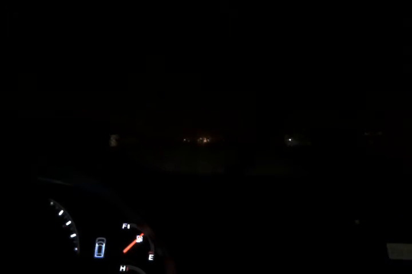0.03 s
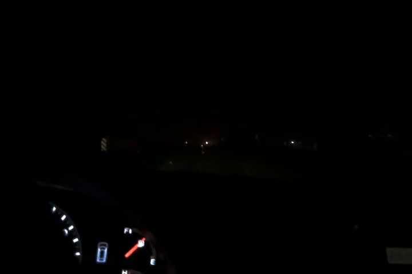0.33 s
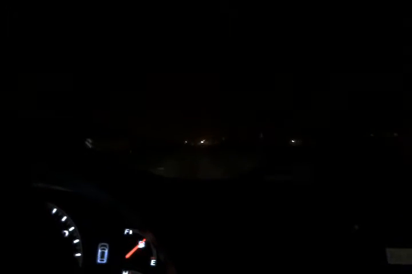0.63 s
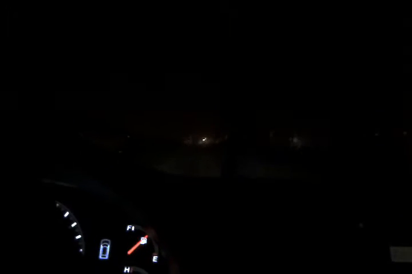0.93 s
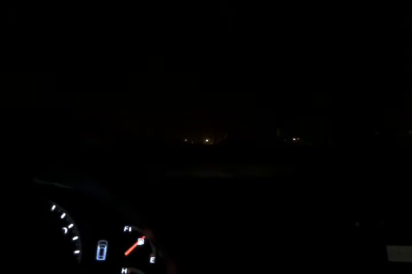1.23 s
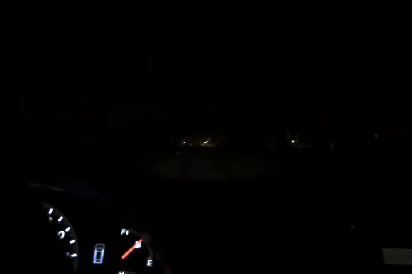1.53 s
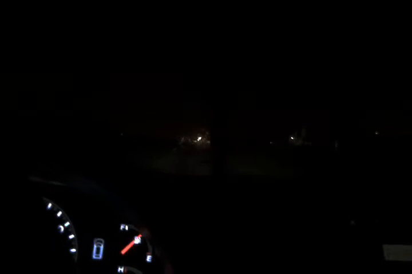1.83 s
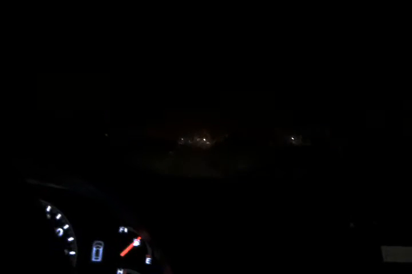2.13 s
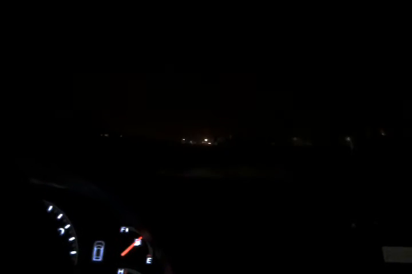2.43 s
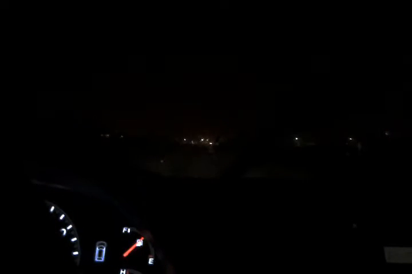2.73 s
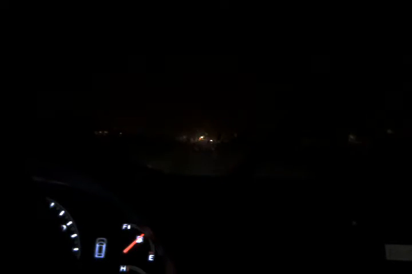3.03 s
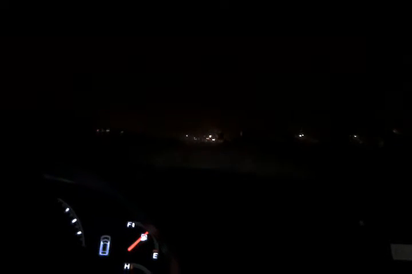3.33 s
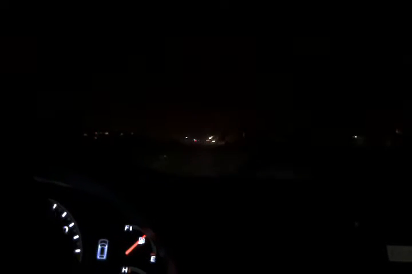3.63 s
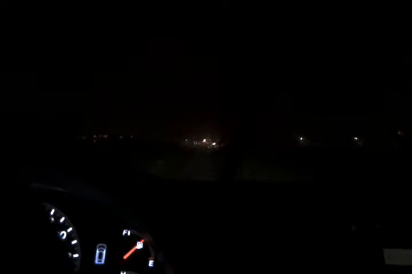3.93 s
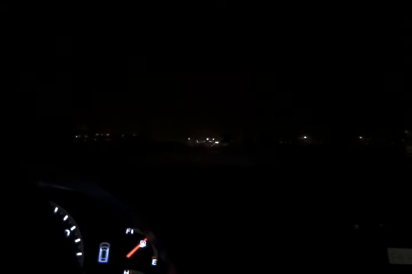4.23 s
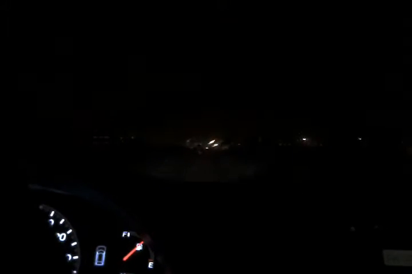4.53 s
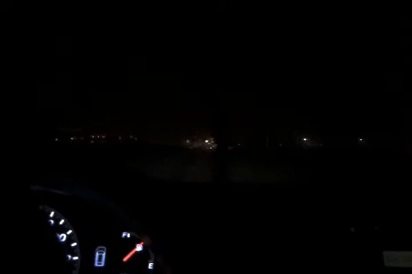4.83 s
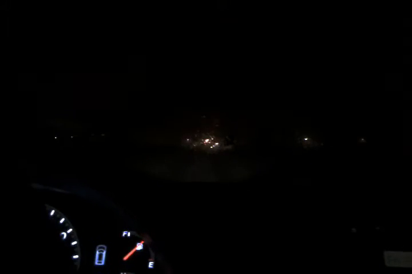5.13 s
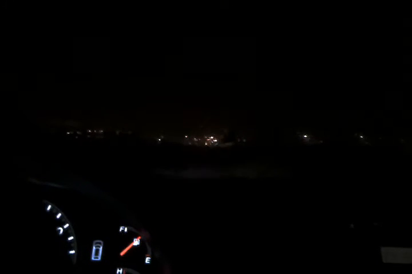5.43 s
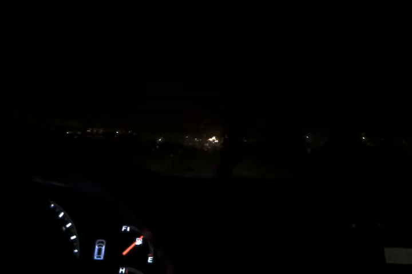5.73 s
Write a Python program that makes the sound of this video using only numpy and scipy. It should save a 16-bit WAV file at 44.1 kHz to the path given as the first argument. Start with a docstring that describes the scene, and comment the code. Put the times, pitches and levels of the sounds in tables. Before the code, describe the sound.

Heavy rain and small hail tick sharply on a car's windshield and drum on the roof, heard inside over faint road rumble.

```python
"""Inside a car driving slowly through a night downpour of heavy drops and small hail.
Each strike on the windscreen cracks and leaves a short bright ring; strikes on the roof drum dully through the lining.
Countless smaller ones patter between them, bunching into short flurries, over a faint road rumble, heard by a phone's two microphones."""
import sys
import numpy as np
from scipy import signal
from scipy.fft import rfft, irfft, next_fast_len
from scipy.io import wavfile

SR = 44100
rng = np.random.default_rng(int(sys.argv[2]) if len(sys.argv) > 2 else 0)


def digitize_waveform(pressure):
    """Quantize a signal to 16-bit integers and store it at the path in sys.argv[1].

    Rows of a 2-D input are taken as channels; values are limited to [-1, 1].
    """
    field = np.atleast_2d(pressure).T
    bounded = np.clip(field, -1, 1)
    quanta = np.round(bounded * 32767).astype(np.int16)
    wavfile.write(sys.argv[1], SR, quanta)


N = 259308

# hard strikes on the windscreen: (s, level dB, top treble relative to the whole dB, distance m, lower ping Hz, upper ping Hz)
GLASS_HITS = [(0.0186, -22.5, -9, 0.8, 5250, 7000), (0.0244, -20.0, -7, 1.2, 5550, 8100),
              (0.052, -22.0, -8, 0.5, 4000, 10150), (0.0858, -24.5, -8, 0.9, 4500, 6800),
              (0.0963, -20.0, -11, 0.8, 4100, 6350), (0.1248, -21.0, -8, 0.9, 5400, 6250),
              (0.1626, -24.5, -5, 0.9, 5300, 9400), (0.1733, -21.5, -6, 1.0, 3650, 9800),
              (0.2008, -18.5, -6, 0.5, 4500, 7800), (0.2341, -22.0, -6, 0.7, 3250, 6700),
              (0.2613, -23.5, -9, 0.7, 4300, 8650), (0.3387, -23.5, -9, 0.9, 5450, 7150),
              (0.3965, -20.5, -7, 1.0, 3550, 6550), (0.4239, -21.0, -6, 0.7, 5100, 9150),
              (0.4441, -19, -8, 0.5, 5350, 6450), (0.4618, -22.0, -9, 1.0, 5150, 10150),
              (0.4886, -20.5, -9, 0.9, 4500, 7300), (0.547, -19.5, -3, 0.5, 5300, 11200),
              (0.5679, -23.5, -7, 0.7, 4950, 9000), (0.6082, -19, -5, 1.0, 4100, 7300),
              (0.6142, -20.0, -4, 0.7, 4450, 10200), (0.6465, -24.0, -7, 0.7, 5550, 7100),
              (0.6631, -19.5, -6, 1.1, 3750, 8900), (0.6885, -21.0, -9, 0.9, 3750, 7750),
              (0.7416, -21.5, -9, 0.7, 4100, 6500), (0.7807, -22.5, -8, 1.0, 3700, 6550),
              (0.8196, -21.5, -7, 1.0, 3950, 7400), (0.8937, -23.0, -7, 0.9, 3700, 10500),
              (0.9115, -22.0, -12, 0.7, 3250, 10150), (0.9892, -15.5, -3, 0.5, 5100, 10100),
              (0.9991, -22.5, -8, 1.1, 3550, 8950), (1.0288, -22, -4, 0.7, 3900, 9500),
              (1.0446, -21.0, -7, 0.5, 3550, 7250), (1.0765, -23.0, -7, 0.9, 4450, 6300),
              (1.0922, -23.5, -9, 0.8, 5100, 7500), (1.169, -25.5, -9, 0.6, 4050, 9500),
              (1.1788, -25.5, -9, 0.6, 4000, 8550), (1.1912, -23.0, -7, 0.9, 4950, 8250),
              (1.1971, -21.0, -8, 1.0, 3900, 7300), (1.2188, -21.0, -9, 1.0, 4100, 7250),
              (1.2738, -23.5, -8, 0.9, 3700, 6550), (1.303, -21.0, -7, 0.9, 4350, 11500),
              (1.3091, -21.5, -6, 0.9, 3650, 9700), (1.3348, -16, -5, 0.5, 4100, 9500),
              (1.4746, -21.0, -4, 0.8, 5200, 10150), (1.4953, -21.0, -9, 1.0, 3750, 8300),
              (1.5123, -25.0, -11, 0.7, 4450, 6950), (1.5598, -21.0, -2, 0.9, 3250, 11450),
              (1.6286, -20.0, -7, 0.7, 4800, 9100), (1.6373, -15.0, -5, 0.5, 4350, 10900),
              (1.6659, -19.0, -7, 0.7, 5100, 6200), (1.7373, -21.0, -7, 0.7, 3300, 6500),
              (1.7558, -23.5, -7, 0.9, 4300, 10950), (1.8314, -24.0, -6, 0.7, 3400, 6300),
              (1.8417, -21.0, -9, 0.6, 3850, 8800), (1.8723, -22.5, -10, 0.9, 4750, 7900),
              (1.8842, -21.0, -10, 0.8, 5350, 6650), (1.9174, -20.0, -8, 0.8, 4250, 9550),
              (2.0397, -20.0, -11, 0.5, 5550, 8800), (2.0608, -17.5, -7, 0.5, 3700, 6400),
              (2.0696, -17.5, -3, 0.35, 3250, 10050), (2.0779, -18, -4, 0.6, 4900, 8450),
              (2.1009, -15.5, -4, 0.7, 3750, 10450), (2.1152, -22.5, -8, 0.9, 4200, 7000),
              (2.1276, -16.0, -4, 0.7, 4350, 10500), (2.1404, -18.5, -4, 0.7, 4600, 10300),
              (2.2267, -22.5, -8, 1.0, 4150, 9800), (2.2597, -18.0, -7, 0.8, 4350, 7200),
              (2.3758, -23.5, -6, 1.1, 3550, 9000), (2.3825, -19.0, -7, 0.8, 4350, 6600),
              (2.428, -21.5, -7, 1.1, 4350, 8800), (2.4736, -22.5, -8, 0.7, 3750, 6700),
              (2.5251, -15.5, -7, 0.6, 4900, 10700), (2.5397, -23.0, -4, 0.7, 3250, 10400),
              (2.7871, -19.5, -7, 1.3, 3450, 6350), (2.8238, -20.5, -7, 0.8, 5250, 10250),
              (2.8666, -20.5, -10, 0.5, 4350, 7300), (2.8754, -19.5, -8, 0.9, 5600, 10300),
              (2.9178, -20.5, -9, 0.7, 3800, 7350), (2.9349, -22.5, -8, 0.9, 4100, 9600),
              (3.013, -25.5, -9, 0.7, 3400, 8250), (3.0478, -19.0, -8, 0.7, 3900, 8500),
              (3.0667, -23, -3, 0.3, 5000, 7300), (3.0905, -16, -4, 0.8, 5600, 6550),
              (3.159, -19.5, -8, 0.7, 4050, 6250), (3.1956, -20.5, -9, 0.8, 4500, 7750),
              (3.2685, -17.5, -5, 0.7, 3650, 8500), (3.2755, -17.5, -5, 0.9, 4000, 6350),
              (3.2964, -20.0, -7, 0.8, 4200, 7450), (3.3132, -23.5, -8, 0.7, 3900, 6700),
              (3.3288, -24.5, -9, 0.6, 4300, 7850), (3.3394, -22.5, -6, 1.1, 3300, 8950),
              (3.3525, -19.5, -6, 0.8, 4300, 11050), (3.3973, -23.5, -5, 1.0, 4000, 11400),
              (3.4389, -22.5, -5, 0.6, 3600, 6850), (3.4452, -20.0, -7, 0.5, 3400, 6650),
              (3.4927, -21.0, -10, 1.0, 4050, 8050), (3.5151, -19.5, -7, 0.7, 4300, 6700),
              (3.5249, -24.5, -6, 0.7, 3800, 10600), (3.5779, -23.5, -11, 0.8, 3450, 6200),
              (3.6059, -23.5, -7, 0.6, 4050, 7700), (3.6487, -23.0, -10, 0.8, 4350, 6700),
              (3.6645, -18.5, -8, 0.7, 3400, 7900), (3.7752, -20.5, -7, 0.8, 4050, 10100),
              (3.8448, -19.5, -9, 0.9, 4350, 7500), (3.8532, -21.0, -8, 0.9, 3400, 7250),
              (3.8807, -19.5, -9, 0.7, 3900, 8900), (3.9093, -23.0, -5, 0.9, 3350, 9800),
              (3.9388, -20.5, -6, 0.9, 5050, 7500), (3.9559, -19.0, -4, 0.7, 4650, 9250),
              (3.9642, -21.5, -8, 0.8, 4150, 6550), (3.9705, -22.0, -7, 0.9, 3600, 11400),
              (3.9956, -23.5, -6, 0.9, 4500, 9500), (4.0186, -21.0, -4, 0.6, 4850, 9100),
              (4.032, -22.0, -7, 1.1, 3650, 8300), (4.0889, -19.0, -4, 0.4, 4350, 10500),
              (4.129, -17.5, -8, 1.1, 4350, 7800), (4.1424, -22.0, -10, 0.6, 5550, 6200),
              (4.2122, -22.5, -9, 0.7, 5500, 8450), (4.253, -23.0, -9, 0.7, 4500, 6500),
              (4.2794, -21.0, -7, 0.8, 3900, 7100), (4.328, -18.0, -7, 0.9, 4200, 6300),
              (4.3488, -21.5, -7, 1.1, 3850, 7800), (4.3852, -17, -3, 0.7, 4400, 10400),
              (4.4076, -23.5, -10, 0.6, 4350, 7000), (4.4366, -23, -11, 1.1, 4300, 8600),
              (4.4454, -19.5, -11, 0.6, 4000, 6850), (4.4637, -21.5, -7, 0.9, 5400, 7450),
              (4.5654, -21.0, -6, 1.1, 3550, 6500), (4.6157, -22.0, -10, 0.9, 4250, 6350),
              (4.6705, -25.0, -9, 0.8, 4000, 11500), (4.7051, -23.5, -9, 0.6, 4300, 8800),
              (4.7354, -18.5, -4, 0.7, 4200, 9800), (4.7564, -22.0, -7, 0.8, 3800, 6300),
              (4.8428, -21.5, -6, 0.7, 3800, 11350), (4.882, -19.5, -6, 1.1, 4100, 8150),
              (4.895, -22.0, -5, 1.0, 5250, 8850), (4.913, -21.5, -6, 1.0, 4100, 8250),
              (4.9393, -20.5, -7, 0.6, 4350, 10250), (4.9745, -21.5, -8, 0.7, 3250, 9400),
              (5.0432, -25.0, -6, 0.6, 4050, 6350), (5.0604, -21.5, -2, 0.6, 4800, 11350),
              (5.0703, -25.0, -4, 0.7, 3250, 8750), (5.0958, -24.0, -5, 0.9, 3650, 10400),
              (5.158, -24.0, -8, 0.8, 3250, 8250), (5.1766, -24.0, -4, 0.7, 5600, 7500),
              (5.1977, -19.5, -9, 0.7, 3250, 6850), (5.2321, -16.5, -4, 0.6, 3350, 11300),
              (5.2452, -18.5, -6, 1.0, 5400, 9400), (5.2621, -18.0, -5, 0.5, 5150, 9800),
              (5.2753, -21.0, -8, 0.8, 3400, 6500), (5.3588, -21.0, -6, 1.0, 4350, 10150),
              (5.4002, -23, -5, 1.0, 3350, 8850), (5.4124, -23.0, -5, 0.9, 4150, 9900),
              (5.4591, -23.5, -5, 0.6, 3450, 9900), (5.4802, -21.0, -6, 0.6, 4450, 10350),
              (5.4888, -24.0, -8, 0.6, 4050, 10250), (5.5394, -20.0, -9, 1.1, 4200, 6900),
              (5.5502, -23.0, -8, 0.7, 3950, 8050), (5.6659, -20.0, -6, 1.2, 4200, 7050),
              (5.7826, -24.0, -8, 0.8, 5550, 6800), (5.8024, -17.0, -8, 0.7, 4150, 7450),
              (5.8181, -17.0, -6, 0.9, 4400, 7300)]  # fixed
# hard strikes on the roof: (s, level dB, pitch of the struck panel Hz)
ROOF_HITS = [(0.077, -20, 330), (0.094, -18, 620), (0.23, -22, 720), (0.396, -21, 540), (0.45, -24, 740), (0.626, -20, 1220),
             (0.687, -14.5, 440), (0.96, -20, 700), (0.992, -24, 380), (1.084, -20, 670), (1.107, -15, 460), (1.13, -18, 400), (1.16, -21, 700), (1.195, -20, 380),
             (1.34, -24, 1130), (1.381, -23, 670), (1.616, -23, 520), (1.638, -24, 750),
             (2.048, -20, 420), (2.075, -20, 380), (2.217, -23, 600), (2.241, -21, 730), (2.587, -18, 450), (2.631, -18, 400),
             (2.748, -19.5, 620), (2.784, -22, 700), (2.829, -23, 550), (3.002, -22, 390), (3.19, -21, 440),
             (3.244, -18, 440), (3.314, -22, 650), (3.343, -23, 700), (3.386, -20.5, 430), (3.502, -21, 1160), (3.544, -21, 560), (3.689, -16.5, 550),
             (3.754, -23, 1050), (3.79, -15, 450), (4.365, -12.5, 720), (4.541, -17, 420),
             (4.711, -23, 470), (4.787, -23, 440), (4.865, -21, 440), (4.97, -20, 900), (5.232, -22, 500),
             (5.257, -22, 500), (5.364, -22, 460), (5.413, -18, 420), (5.637, -19, 660), (5.659, -16, 1240),
             (5.761, -19, 420), (5.802, -21, 430)]  # fixed
# what the windscreen radiates: (Hz, dB)
GLASS_COLOUR = [(200, -35), (700, -2), (1300, -7.5), (1900, -5.5), (2500, -4.5), (3050, -0.5), (4100, 1.5), (4800, -3), (6300, -1.5), (7800, -0.5), (9200, -5), (11000, -4.5), (12200, -6), (14000, -10)]
# what the lined roof radiates: (Hz, dB)
ROOF_COLOUR = [(40, -42), (70, -30), (110, -15.5), (190, -21.5), (260, -7.5), (345, -5.5), (450, -2.5), (620, -5), (900, -7), (1250, -7.5), (1600, -8), (2300, -13), (4000, -12.5)]
# tyres and engine through the floor: (Hz, dB)
ROAD_COLOUR = [(20, -27), (45, -16), (70, -13), (100, -10), (135, -2), (200, -2), (400, 2.5), (1000, -6), (4000, -75)]
ROAD_DB = -39
# panels: (wavefront level dB, crack s, ring level dB, ring time s at 1 kHz, its fall with frequency as an exponent,
# travel time s per m at 1 kHz, level of the struck spot's own ping dB, its width as a share of its pitch)
GLASS = dict(front_db=-3, crack_s=.0022, ring_db=-12.3,  # fixed
             t60=.1, damping=.12, travel_s=.0018, ping_db=1, ping_width=.09)
ROOF = dict(front_db=3.5, crack_s=0.0033, ring_db=-4, t60=0.081, damping=0.54, travel_s=.0015, ping_db=5, ping_width=0.069)
# likeness of the two microphones: (Hz, correlation)
LIKENESS = [(60, -0.78), (130, -0.11), (300, 0.2), (600, 0.11), (900, 0.58), (1200, 0.91), (1500, 1), (1900, 0.4), (2200, -0.22), (2500, -0.5), (2640, -1), (3070, -1), (3300, -0.39), (3800, 0.26), (4200, 1), (5000, 0.11)]
# the right microphone gets more bass: (Hz, left minus right dB)
BALANCE = [(30, 3), (100, -5.5), (600, -3.5), (1200, -1.5), (3000, 0), (14000, -0.2)]
TOP_HZ = 14000  # fixed
RING_SAMPLES = 4096  # fixed
BAND_HZ = 125 * 2 ** (np.arange(11) / 1.5)  # fixed
# roof and cabin resonances: (Hz, width Hz, dB over the plain panel)
ROOF_MODES = [(155, 24, 2.5), (248.5, 5.5, 1.5), (344, 44, -3.5), (443.5, 35, -3.5), (567.6, 16, 3), (680, 107, -5), (871, 26, -8), (1097, 72, -6.5), (1230, 110, -8)]
# flurries of small drops splattering on the windscreen: (start s, length s, level dB, extra treble dB)
GLASS_FLURRIES = [(0.018, 0.045, -24.5, 1.0), (0.08, 0.081, -26.5, -0.5), (0.164, 0.015, -26.0, 2.0),
                  (0.233, 0.109, -26.0, 1.0), (0.39, 0.118, -24.5, -1.0),
                  (0.547, 0.029, -27.5, -1.0), (0.619, 0.041, -27.0, 0.5), (0.662, 0.043, -24.0, -2.0),
                  (0.736, 0.039, -24.5, 0.5), (0.778, 0.049, -21.5, 0.5), (0.83, 0.171, -25.5, 0.0),
                  (1.028, 0.017, -27.0, -1.0), (1.07, 0.037, -24.0, -0.5), (1.191, 0.087, -25.5, -0.5),
                  (1.335, 0.085, -22.5, 1.5), (1.423, 0.049, -28.0, 0.0), (1.475, 0.039, -23.5, -1.5),
                  (1.561, 0.035, -27, 0), (1.628, 0.1, -24, -0.5), (1.736, 0.077, -24.0, 1.5), (1.816, 0.079, -26.0, 0.0),
                  (1.912, 0.037, -22.5, 0.5), (1.952, 0.041, -25.0, -0.5), (2.099, 0.213, -25.0, 1.0),
                  (2.315, 0.029, -25.5, 0.0), (2.369, 0.021, -24.0, -1.0), (2.426, 0.061, -26.0, -1.5),
                  (2.524, 0.087, -22.5, 1.0), (2.614, 0.041, -24.5, 1.0), (2.658, 0.065, -29.0, -0.5),
                  (2.726, 0.069, -22.5, 0.5), (2.816, 0.029, -23.5, -1.0), (2.865, 0.067, -23.0, 1.5),
                  (2.935, 0.085, -26.5, -1.5), (3.129, 0.077, -21.5, 0.0), (3.209, 0.041, -25.5, 0.5),
                  (3.289, 0.027, -23.0, 1.5), (3.318, 0.023, -27.0, -1.5), (3.344, 0.019, -22.5, 0.0),
                  (3.396, 0.015, -24.0, 1.0), (3.438, 0.059, -25.5, -0.5), (3.514, 0.075, -25.0, -1.0),
                  (3.606, 0.053, -25.5, 0.0), (3.674, 0.075, -26.0, 0.0), (3.751, 0.057, -23.0, 0.5),
                  (3.812, 0.035, -27, 0), (3.877, 0.041, -25.5, 0.5), (3.935, 0.017, -26.5, -4.0), (3.955, 0.021, -24.0, -0.5),
                  (4.017, 0.059, -26.0, 0.5), (4.155, 0.045, -29, 0), (4.208, 0.017, -26.0, -0.5), (4.254, 0.039, -22.5, 2.5),
                  (4.324, 0.037, -21.5, -0.5), (4.432, 0.057, -23.5, -0.5), (4.564, 0.025, -23.5, 0.0),
                  (4.592, 0.141, -27.0, -0.5), (4.735, 0.063, -23.0, 1.5), (4.841, 0.037, -29.0, -1.0),
                  (4.881, 0.039, -22.5, 0.5), (4.939, 0.073, -25.0, 0.5), (5.134, 0.071, -26.0, 0.0),
                  (5.226, 0.045, -27.5, 1.5), (5.285, 0.045, -29, 0), (5.358, 0.03, -21.5, 2.0), (5.398, 0.021, -25.0, 1.5),
                  (5.478, 0.045, -28.0, -1.5), (5.537, 0.023, -24.0, -1.0), (5.593, 0.043, -23.5, 2.0),
                  (5.695, 0.035, -25.0, 1.0), (5.801, 0.045, -25.0, 0.0)]  # fixed
# lulls in the patter on the windscreen: (start s, length s, depth dB)
GLASS_LULLS = [(0.347, 0.015, -6), (0.521, 0.025, -4), (0.582, 0.014, -4), (1.009, 0.02, -13), (1.285, 0.013, -5),
               (1.599, 0.018, -8), (2.064, 0.006, -5), (2.087, 0.014, -10), (2.119, 0.009, -5), (3.023, 0.022, -5), (3.423, 0.015, -8),
               (3.921, 0.015, -7), (4.102, 0.022, -4), (4.312, 0.012, -5), (4.493, 0.049, -5), (4.807, 0.012, -5),
               (5.021, 0.019, -4), (5.106, 0.028, -3), (5.21, 0.012, -5), (5.524, 0.012, -6), (5.677, 0.02, -6), (5.752, 0.024, -4),
               (5.788, 0.013, -5)]  # fixed
# the colour shifts as the drops move over a panel: (lowest Hz, highest Hz, changes per s, spread dB)
GLASS_WANDER = dict(lo_hz=1500, hi_hz=13000, per_s=30, spread_db=2)  # fixed
ROOF_WANDER = dict(lo_hz=260, hi_hz=1800, per_s=12, spread_db=2.5)  # fixed
# flurries of small drops drumming on the roof: (start s, length s, level dB)
ROOF_FLURRIES = [(0.03, 0.1, -30.5), (0.2, 0.1, -27.5), (0.378, 0.15, -28), (0.61, 0.02, -25.5),
                 (0.68, 0.089, -30), (0.804, 0.054, -28.5), (0.883, 0.09, -29.5), (1.074, 0.19, -28.5),
                 (1.331, 0.089, -31), (1.482, 0.045, -29), (1.544, 0.052, -28), (1.615, 0.079, -26),
                 (1.717, 0.04, -31.5), (1.787, 0.022, -28), (1.836, 0.028, -34), (1.917, 0.056, -30),
                 (2.039, 0.047, -28.5), (2.197, 0.2, -29), (2.448, 0.059, -29.5), (2.534, 0.14, -27),
                 (2.746, 0.054, -28.5), (2.858, 0.075, -29.5), (2.968, 0.053, -26), (3.131, 0.072, -25),
                 (3.225, 0.22, -27), (3.487, 0.03, -30), (3.534, 0.06, -30), (3.605, 0.12, -28),
                 (3.73, 0.16, -27.5), (3.955, 0.028, -26), (4.178, 0.052, -29), (4.322, 0.099, -26),
                 (4.539, 0.013, -27.5), (4.577, 0.02, -23.5), (4.647, 0.22, -28), (4.821, 0.11, -31),
                 (4.962, 0.055, -25), (5.228, 0.058, -25), (5.308, 0.072, -27), (5.408, 0.065, -27.5),
                 (5.627, 0.028, -23), (5.698, 0.029, -24), (5.755, 0.014, -37), (5.798, 0.047, -27.5)]
# how the drops arrive: (level of the thin fall between flurries dB, a flurry's attack s, its sag dB per s, its release s)
GLASS_FALL = dict(between_db=-29, attack_s=.002, sag_db_per_s=5, release_s=.006)  # fixed
ROOF_FALL = dict(between_db=-31.5, attack_s=0.0055, sag_db_per_s=4, release_s=0.005)  # fixed
# pitches at which spots on the glass ping (lowest Hz, highest Hz)
PING_HZ = (3300, 11000)  # fixed
# hard strikes on the glass stand above the patter (dB)
GLASS_HIT_DB = 4.7  # fixed
# small drops: (drops per s, spread of their sizes as an exponent, spread of their colours dB, distance m)
GLASS_DROPS = dict(per_s=480, size_power=.24, spot_db=3.5, distance=1.2)  # fixed
# on the roof: (drops per s, spread of their sizes as an exponent, spread of their colours dB, distance m)
ROOF_DROPS = dict(per_s=400, size_power=0.21, spot_db=2.5, distance=.8)  # fixed
# a hard strike on the glass, in the same terms: a fuller crack, and the struck spot pings clearly
STONE = dict(front_db=-4.5, crack_s=.0024, ring_db=-14.5,  # fixed
             t60=.1, damping=.12, travel_s=.002, ping_db=-.5, ping_width=.09)
# level of the small drops on the glass (dB), and of the fine spray among them (dB relative to the drops)
GLASS_PATTER_DB, SPRAY_DB = -.5, -9  # fixed
# a stronger flurry hits harder: extra top treble (dB per dB of its strength)
FLURRY_BITE = .35  # fixed
# ceiling toward which the highest peaks are rounded (full scale = 1)
CEILING = 1.25  # fixed


def undb(db):
    """Decibels to gain."""
    return 10 ** (np.asarray(db) / 20)


def unit(x):
    """Scale to rms 1."""
    return x / np.sqrt(np.mean(x ** 2))


def over_hz(points, size=N):
    """Rows (Hz, value) read at every frequency of a transform, on a log axis."""
    hz, value = np.transpose(points)
    return np.interp(np.log(np.fft.rfftfreq(size, 1 / SR) + 1), np.log(hz), value)


def colour(x, points):
    """Give a sound the spectrum (Hz, dB); white noise keeps its power."""
    size = next_fast_len(N + RING_SAMPLES)
    return irfft(rfft(x, size) * unit(undb(over_hz(points, size))), size)[..., :N]


def strikes(band_db, distance, ping_hz, front_db, crack_s, ring_db, t60, damping, travel_s, ping_db, ping_width):
    """One stereo response per strike: sharp wavefronts, a crack, scattered waves that die away, and the spot's own pings."""
    t = np.arange(RING_SAMPLES) / SR
    shares = np.array([over_hz(np.c_[BAND_HZ, BAND_HZ == hz], RING_SAMPLES) for hz in BAND_HZ])
    out = undb(front_db) * irfft(wavefronts(distance, travel_s) * (undb(band_db) @ shares)[:, None])
    scatter = rfft(rng.standard_normal((len(distance), 2, RING_SAMPLES)))
    far = distance[:, None]
    for hz, share, db in zip(BAND_HZ, shares, band_db.T):
        khz = hz / 1000  # fixed
        age = np.maximum(t - far * travel_s / np.sqrt(khz) * (1 - np.sqrt(hz / BAND_HZ[-1])), 0)
        crack = np.exp(-age / (crack_s * far))  # a far strike is smeared for longer
        ring = undb(ring_db) * np.exp(-np.log(1000) * age * khz ** damping / t60)
        build_up = 1 - np.square(crack)
        out += irfft(scatter * share) * (undb(db)[:, None] * build_up * (crack + ring))[:, None]
    return resonate(out, [(pitch, ping_width * pitch, ping_db) for pitch in np.atleast_2d(ping_hz)[..., None, None]])


def place(times, db, sounds):
    """Lay each sound down at its time and level."""
    out = np.zeros((2, N + RING_SAMPLES))
    for start, gain, sound in zip(np.clip(times * SR, 0, N - 1).astype(int), undb(db), sounds):
        out[:, start:start + RING_SAMPLES] += gain * sound
    return out[:, :N]


def patter(panel, pitches, per_s, size_power, spot_db, distance, count=40):
    """Small drops of random size fall on many spots of a panel, each spot with its own colour and pitch."""
    band_db = spot_db * rng.standard_normal((count, len(BAND_HZ)))
    spots = strikes(band_db, distance * rng.uniform(0.4943, 1.5, count), rng.choice(pitches, count), **panel)
    spots = spots / np.std(spots, axis=(1, 2), keepdims=True)
    when, size, where = rng.random((int(per_s * N / SR), 3)).T
    db = -20 * size_power * np.log10(1 - .95 * size)  # many small, few large
    return place(when * N / SR, db, (spots[k] for k in (where * count).astype(int)))


def windscreen(brightness=1.3, usual_treble_db=-6.0, hit_spot_db=0.95):
    """Hard strikes tick on the glass, each at its spot's pitches and brighter when the contact is shorter, over a sizzle of small drops."""
    s, db, treble_db, distance, lower_hz, upper_hz = np.transpose(GLASS_HITS)
    band_db = brightness * np.outer(treble_db - usual_treble_db, np.clip(np.log2(BAND_HZ / 6500), -1, 1))
    band_db = band_db + hit_spot_db * rng.standard_normal(band_db.shape)  # each spot stirs other modes
    ticks = levelled(strikes(band_db, distance, [lower_hz, upper_hz], **STONE), lo_hz=3130, hi_hz=10600)
    return colour(place(s, db + GLASS_HIT_DB, ticks) + sizzle() * undb(GLASS_PATTER_DB), GLASS_COLOUR)


def roof(hit_db=-5.0, patter_db=-3.5, focus_db=2, lowest_hz=270, highest_hz=1500):
    """Strikes drum on the sheet metal; each favours the pitch of the panel that it lands on."""
    s, db, hz = np.transpose(ROOF_HITS)
    band_db = -focus_db * np.abs(np.log2(BAND_HZ / hz[:, None]))
    knocks = levelled(strikes(band_db, rng.uniform(0.657, 1.34, len(s)), hz, **ROOF), lo_hz=250, hi_hz=1510)
    pitches = np.geomspace(lowest_hz, highest_hz, len(s))
    small = unit(wander(patter(ROOF, pitches, **ROOF_DROPS), **ROOF_WANDER)) * flurries(ROOF_FLURRIES, **ROOF_FALL)
    return resonate(colour(place(s, db + hit_db, knocks) + small * undb(patter_db), ROOF_COLOUR), ROOF_MODES)


def road():
    """A low, even rumble fills the cabin."""
    return undb(ROAD_DB) * colour(rng.standard_normal((2, N)), ROAD_COLOUR)


def wavefronts(distance, travel_s, count=4, port_lag_s=0.000333):
    """Spectra of a strike's direct wave and its echoes off the panel's edges; low waves travel slower, so each is a falling chirp."""
    hz = np.fft.rfftfreq(RING_SAMPLES, 1 / SR)
    detour = 1 + np.arange(count) * rng.uniform(0.4905, 2, (len(distance), count))
    path = (distance[:, None] * detour)[:, None, :, None]
    lag = port_lag_s * rng.random((len(distance), 2, count, 1))
    start = distance[:, None, None, None] * travel_s / np.sqrt(BAND_HZ[-1] / 1000)  # fixed
    cycles = 2 * path * travel_s * np.sqrt(1000 * hz) + (lag - start) * hz  # fixed
    return np.sqrt(SR / 1000) * np.sum(np.exp(-2j * np.pi * cycles) / detour[:, None, :, None], axis=2)  # fixed


def resonate(x, modes):
    """Let a sound ring in the modes (Hz, width Hz, dB)."""
    length = x.shape[-1]
    size = next_fast_len(length + RING_SAMPLES // 2)
    f = np.fft.rfftfreq(size, 1 / SR)
    response = 1 + sum(undb(db) / (1 + 2j * (f - hz) / width) for hz, width, db in modes)
    return irfft(rfft(x, size) * response, size)[..., :length]


def flurries(rows, between_db, attack_s, sag_db_per_s, release_s):
    """Strength of the patter: a thin steady fall, and flurries that set in quickly, sag and die away."""
    t = np.arange(N) / SR
    power = np.full(N, undb(between_db) ** 2)
    for start, length, db in rows:
        near = slice(max(int(start * SR), 0), int((start + length + 6 * release_s) * SR))  # fixed
        age = t[near] - start
        shape = np.clip(age / attack_s, 0, 1) * np.exp(-np.maximum(age - length, 0) / release_s)
        power[near] += (shape * undb(db - sag_db_per_s * age)) ** 2
    return np.sqrt(power)


def levelled(sounds, lo_hz, hi_hz):
    """Give all strikes the same energy in a band, so that a near one packs it into a sharper peak."""
    hz = np.fft.rfftfreq(RING_SAMPLES, 1 / SR)
    rms = np.std(rfft(sounds)[..., (hz > lo_hz) & (hz < hi_hz)], axis=(1, 2), keepdims=True)
    return sounds * np.mean(rms) / rms


def wander(x, lo_hz, hi_hz, per_s, spread_db, count=16, size=256):
    """As the drops land on other parts of a panel, each narrow band swells and fades on its own."""
    centres, spectrum = np.geomspace(lo_hz, hi_hz, count), rfft(x)
    moment = np.arange(N) / SR * per_s
    levels = spread_db * rng.standard_normal((count, size))
    return sum(irfft(spectrum * over_hz(np.c_[centres, centres == hz]), N) * undb(np.interp(moment, np.arange(size), db))
               for hz, db in zip(centres, levels))


def lulls(edge_s=0.0006):
    """For an instant hardly a drop lands on the glass."""
    t = np.arange(N) / SR
    return undb(sum(np.interp(t, [start - edge_s, start + edge_s, start + length - edge_s, start + length], [0, db, db, 0])
                    for start, length, db in GLASS_LULLS))


def sizzle(split_hz=5800, count=60):
    """Small drops splatter on the glass and a fine spray fills the gaps; a flurry of finer drops is brighter."""
    drops = unit(patter(GLASS, np.geomspace(*PING_HZ, count), **GLASS_DROPS))
    small = unit(wander(drops + undb(SPRAY_DB) * rng.standard_normal((2, N)), **GLASS_WANDER))
    low = signal.sosfiltfilt(signal.butter(3, split_hz, fs=SR, output="sos"), small)
    s, length, db, treble_db = np.transpose(GLASS_FLURRIES)
    body = flurries(np.c_[s, length, db - treble_db / 2], **GLASS_FALL)
    top = flurries(np.c_[s, length, db + treble_db / 2], **GLASS_FALL)
    top = top * unit(top) ** FLURRY_BITE
    return (low * body + (small - low) * top) * lulls()


def scene():
    """Glass, roof and road together."""
    return windscreen() + roof() + road()


def microphones(x, ripple=0.38, ripple_hz=2900, ripple_from_hz=5000):
    """The spaced pair hears some bands in step and others in opposition, alternating up through the treble."""
    hz = np.fft.rfftfreq(N, 1 / SR)
    likeness = over_hz(LIKENESS) - ripple * np.sin(2 * np.pi * np.maximum(hz - ripple_from_hz, 0) / ripple_hz)
    likeness = np.clip(likeness, -.9996, .997)  # fixed
    left, right = rfft(x)
    mid, side = (left + right) / 2 * np.sqrt(1 + likeness), (left - right) / 2 * np.sqrt(1 - likeness)
    lean = undb(over_hz(BALANCE) / 2)
    return irfft(np.array([(mid + side) * lean, (mid - side) / lean]), N)


def record(dry):
    """The phone widens the stereo, rounds the highest peaks and cuts the top."""
    return signal.sosfilt(signal.ellip(10, .2, 70, TOP_HZ, fs=SR, output="sos"), CEILING * np.tanh(microphones(dry) / CEILING))


dry = scene()
out = record(dry)
digitize_waveform(out)
```